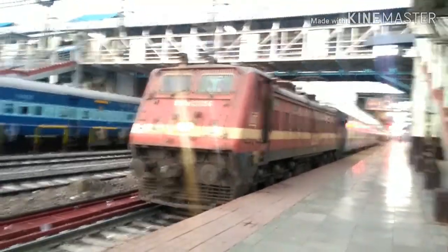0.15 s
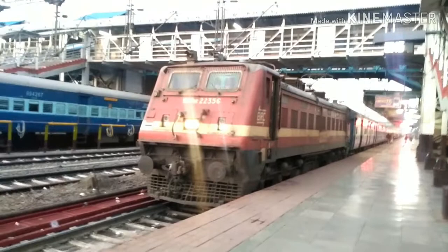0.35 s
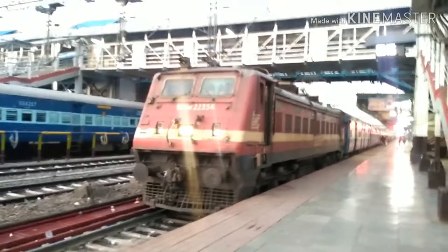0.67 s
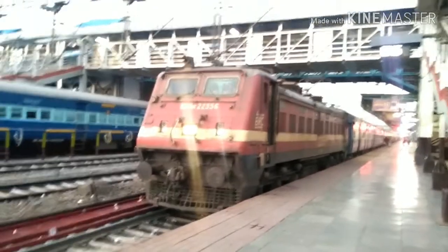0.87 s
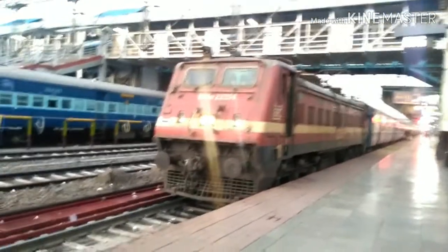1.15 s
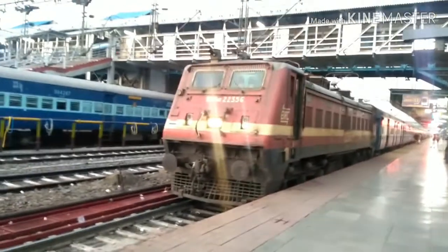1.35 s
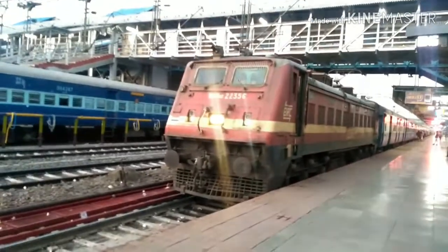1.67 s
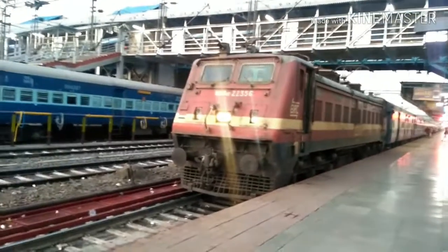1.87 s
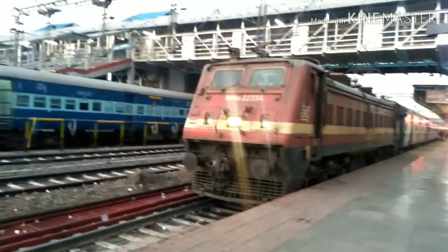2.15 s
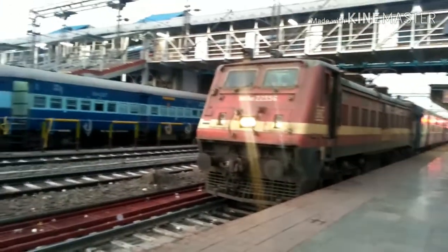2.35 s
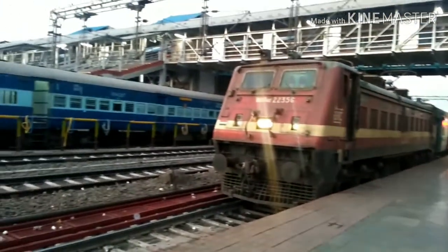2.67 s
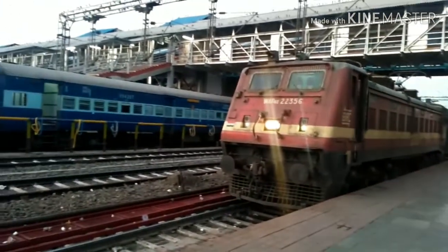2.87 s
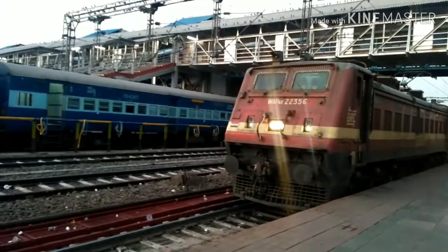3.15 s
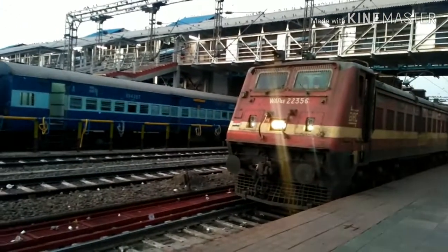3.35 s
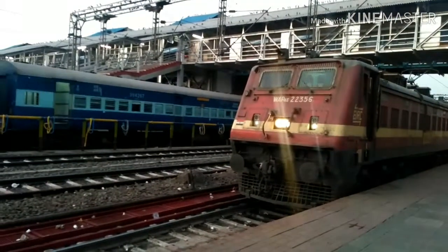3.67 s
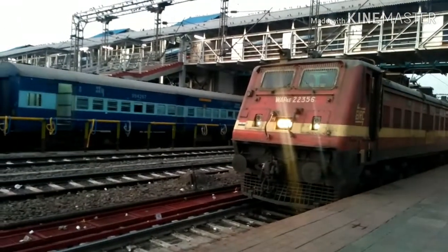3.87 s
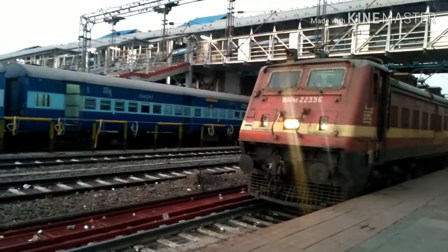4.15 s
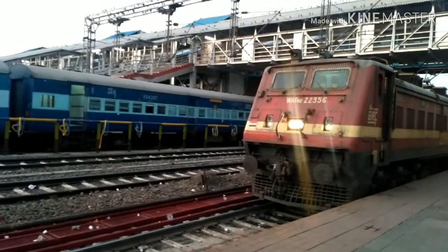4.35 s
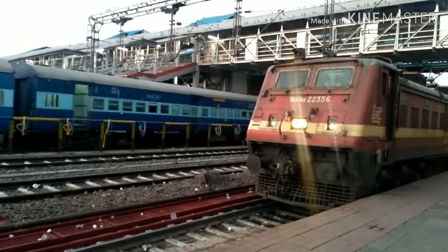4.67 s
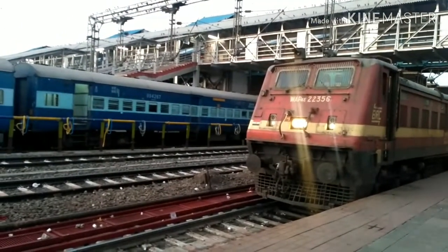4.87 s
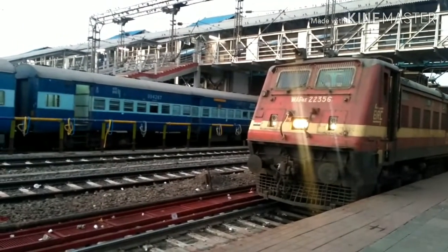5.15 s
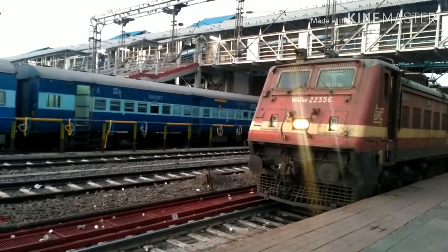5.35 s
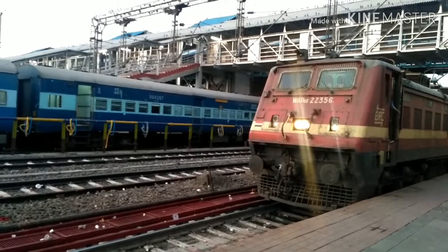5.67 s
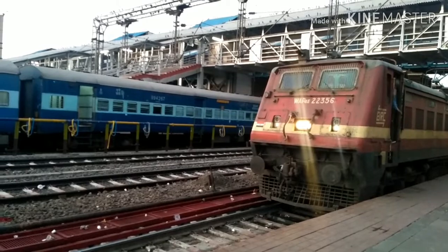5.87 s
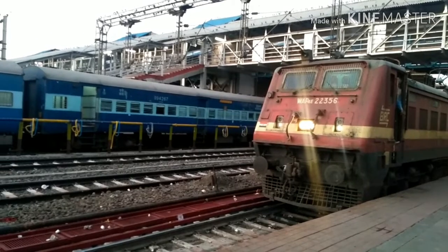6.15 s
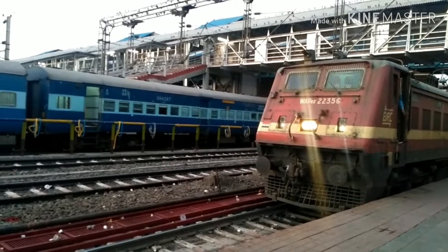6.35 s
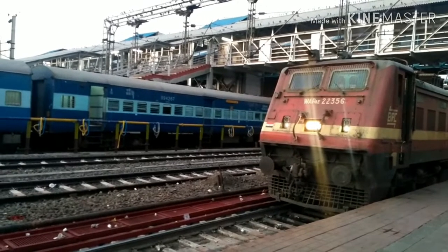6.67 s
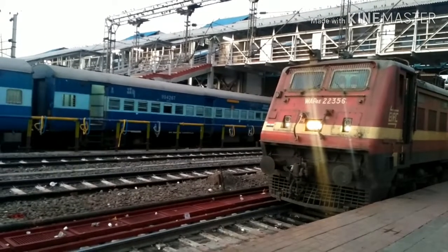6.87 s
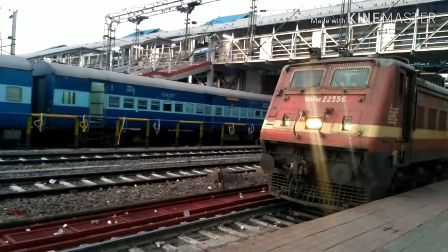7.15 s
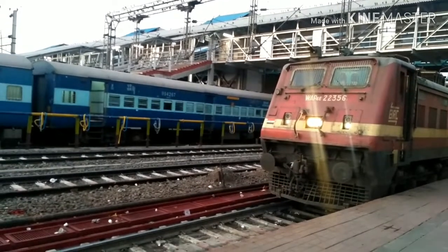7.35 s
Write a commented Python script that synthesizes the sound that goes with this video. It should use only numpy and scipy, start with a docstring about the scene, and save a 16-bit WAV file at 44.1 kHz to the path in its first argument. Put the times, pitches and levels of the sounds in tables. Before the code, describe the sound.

Steady low machine hum and blower roar, twittering birds under a roof, one short air hiss, later a much louder sharp blast of vented air.

```python
"""Locomotive venting brake air under a station roof

An electric locomotive stands at a roofed platform and twice vents brake air, the second time loud and close:
noise jets that reach lower as they blow harder. An idling engine and a compressor hum below as sines, blowers
roar and whine as filtered noise, and soft pitched blips ring in the rumble. Near birds chirp with clear
overtones and echo from the roof; a flock farther off blurs into a twitter of gliding noise bands."""
import sys
import numpy as np
from scipy import signal
from scipy.fft import rfft, irfft
from scipy.io import wavfile
from scipy.ndimage import uniform_filter1d

SR = 44100
rng = np.random.default_rng(int(sys.argv[2]) if len(sys.argv) > 2 else 0)


def unload_wav(signal):
    """Save mono or channel-first audio to the path in sys.argv[1] as 16-bit WAV at rate SR, clipped to [-1, 1]."""
    wavfile.write(
        sys.argv[1],
        SR,
        np.round(np.clip(np.atleast_2d(signal).T, -1, 1) * 32767).astype(np.int16),
    )


N = 331191
T = np.arange(N) / SR
HZ = np.maximum(np.fft.rfftfreq(N, 1 / SR), 1)

# Engine hum, steady tones: (multiple of the cycle rate, level [dB])
ENGINE_TONES = [(7, -66), (9, -60), (10, -66), (11, -62), (12, -60), (16, -57), (17, -63)]
# Strongest engine tones, which also waver by chance: (multiple of the cycle rate, mean level [dB])
WAVERING_ENGINE_TONES = [(13, -47.5), (15, -48)]
# Compressor hum, steady tones: (multiple of the cycle rate, level [dB])
COMPRESSOR_TONES = [(5, -78), (6, -65), (7, -69), (9, -72.5), (10, -91), (11, -61.5), (12, -61.5),
                    (13, -70), (17, -92)]
# Slow swells of two hum tones: (time [s], engine tone 8 mean level [dB], compressor tone 14 level [dB])
HUM_SWELLS = [(0.0, -58, -64), (0.12, -44.5, -49.5), (0.77, -45.5, -50), (0.9, -43.5, -66.5),
              (1.07, -49, -49.5), (2.53, -44, -65), (2.82, -54, -57.5), (2.97, -51.5, -80),
              (3.03, -48, -60.5), (3.72, -42, -65.5), (4.1, -51, -56.5), (5.21, -45.5, -48.5),
              (5.88, -50.5, -67), (6.78, -45, -72.5), (6.94, -46.5, -57.5), (7.51, -52, -66.5)]
# Blower whines: (pitch [Hz], width [Hz], level [dB])
BLOWER_WHINES = [(300, 3, -59), (866.7, 4, -63), (968.8, 1, -63), (1194, 3, -68), (5432, 30, -66)]
# Slow course of blowers and station: (time [s], level below 2 kHz [dB], treble re its usual level [dB])
ROAR_COURSE = [(0.0, -44.5, 0.5), (0.44, -44, 1), (1.57, -44, -1.5), (1.78, -44.5, -1), (3.91, -44.5, 1.5),
               (4.14, -44.5, 1), (6.07, -44, -0.5), (6.3, -44, -1), (7.51, -44.5, -3)]
# Colour of blowers and station: (frequency [Hz], relative density [dB per Hz])
ROAR_COLOUR = [(25, -26), (36, -29.5), (44, -20.5), (90, -14), (125, -8), (250, -7.5), (330, -13),
               (700, -11.5), (950, -16.5), (1400, -19.5), (3400, -23), (4700, -27), (6000, -30),
               (10000, -26), (15300, -46)]
# Far flock, lower voices, clearest calls: (time of peak [s], level [dB], pitch [Hz], held [s])
LOW_CALLS = [(.178, -43.5, 3140, 0.0188), (.225, -47.5, 3190, 0.0147), (.5, -48, 3100, 0.0556),
             (.75, -44, 3440, 0.016), (.9, -51, 3345, 0.0227), (1.45, -50, 3250, 0.018),
             (2.0, -47, 3240, 0.046), (2.1, -51, 3260, 0.105), (2.47, -48, 3270, 0.022),
             (2.655, -43.5, 3120, 0.04943), (2.75, -47, 3400, 0.034), (2.85, -49.5, 3350, 0.056),
             (2.92, -42, 3160, 0.0656), (3.011, -42.5, 3400, 0.03033), (3.09, -43, 3220, 0.0196),
             (3.435, -46, 3240, 0.0238), (3.54, -48, 3380, 0.0178), (3.6, -40, 3190, 0.037),
             (3.74, -46, 3200, 0.0274), (3.78, -38.5, 3260, 0.013), (3.85, -47, 3210, 0.036),
             (3.97, -48.5, 3116, 0.095), (4.1, -41.5, 3250, 0.0545), (4.17, -39, 3380, 0.0437),
             (4.32, -47.5, 3100, 0.085), (4.44, -46, 3401, 0.051), (4.5, -42.5, 3160, 0.03),
             (4.75, -51.5, 3290, 0.0179), (4.94, -51, 3190, 0.096), (5.05, -47.5, 3370, 0.056),
             (5.14, -46, 3000, 0.032), (5.21, -48, 3094, 0.098), (5.44, -50, 3240, .02),
             (5.62, -43, 3310, 0.034), (5.87, -48.5, 3260, 0.028), (6.99, -52.5, 3300, 0.0096),
             (7.17, -49.5, 3290, 0.028), (7.34, -52, 3250, 0.028)]
# Far flock, higher voices: (time of peak [s], level [dB])
HIGH_CALLS = [(1.49, -55.5), (1.72, -56.5), (2.23, -50.5), (2.3, -48), (2.36, -48.5), (2.475, -41.5),
              (2.52, -52.5), (2.78, -44.5), (2.93, -53.5), (3.03, -57.5), (3.24, -46.5), (3.34, -50.5),
              (3.52, -51), (3.62, -55), (3.76, -53), (4.17, -46.5), (4.25, -51.5), (4.51, -50),
              (4.58, -56.5), (4.68, -49.5), (4.74, -51), (4.78, -59), (4.996, -53), (5.05, -56.5),
              (5.13, -52), (5.47, -53.5)]
# Brake air, one list per venting: (time [s], jet core near 10 kHz [dB], shoulder near 6 kHz re core [dB])
VENTINGS = [
    [(0.158, -40, -12), (0.176, -32.5, -32), (0.23, -25, -9.5), (0.3, -23.5, -12.5), (0.342, -23.5, -14.5),
     (0.418, -21, -17.5), (0.466, -20.5, -10), (0.574, -23, -12.5), (0.698, -33, -18), (0.79, -55, -10)],
    [(5.51, -44.5, -17), (5.54, -21.5, -21), (5.55, -16, -11.5), (5.63, -15, -12), (5.72, -16, -13.5),
     (5.92, -14, -16), (6.05, -18, -16), (6.075, -15, -17), (6.13, -9.5, -11), (6.27, -8.5, -8.5),
     (6.32, -13, -7.5), (6.43, -22, -7.5), (6.56, -25.5, -20.5), (6.6, -35.5, -20.5), (6.64, -44.5, -10),
     (7.51, -48.5, -10.5)],
]
# Share of extra top in each venting: the first is farther off and duller: (share [gain])
VENTING_SHARPNESS = [-0.263, 0.044]
# Colour of the air jet: (frequency [Hz], relative density [dB per Hz])
JET_COLOUR = [(900, -46), (1500, -28.5), (2700, -18), (3900, -20), (4800, -17.5), (5100, -23.5),
              (6600, -17), (8600, 0), (10600, 1.5), (12200, -1), (15300, -15)]
# Near birds: (start [s], time to peak [s], length [s], first pitch [Hz], last pitch [Hz], peak level [dB],
# roughness at first [about 0-1], first throat centre [Hz], last throat centre [Hz], throat width [Hz])
NEAR_CHIRPS = [ (.172, 0.0182, 0.0344, 3270, 3200, -33.5, 0.2, 11000, 10600, 5000),
               (.205, 0.0328, 0.0406, 3290, 4410, -38.5, 0.68, 3400, 4500, 1400),
               (.222, .018, 0.0287, 3010, 2930, -28.5, 0.74, 8740, 8700, 1200),
               (.74, 0.024, .055, 2200, 2000, -49.5, 1.02, 4070, 3850, 1989),
               (.825, 0.016, 0.045, 2500, 2033, -48, .9, 8500, 10190, 4000),
               (1.485, 0.018, .045, 2620, 2212, -49, 0.7, 7440, 7900, 5000),
               (1.71, 0.012, 0.051, 2600, 2210, -51, .9, 6030, 6000, 4000),
               (2.05, .015, .06, 3560, 3070, -52, .2, 10700, 9120, 1980),
               (2.268, 0.0046, 0.0476, 3280, 3220, -54.5, 0.2, 11800, 11900, 4100),
               (2.32, 0.0242, 0.078, 2410, 2040, -44.5, 0.65, 7250, 6066, 2500),
               (2.41, 0.0232, 0.0313, 3040, 3150, -57, .1, 12000, 12000, 4000),
               (2.462, 0.0174, 0.077, 2180, 1400, -38.5, 0.45, 8850, 9490, 11990),
               (2.651, 0.00263, 0.0101, 3166, 2820, -41, 0, 9500, 8806, 2500),
               (2.657, .028, 0.037, 2850, 3010, -35, 0.04, 8800, 8900, 2500),
               (2.706, 0.0295, 0.165, 2138, 1467, -29, .1, 9100, 10760, 5540),
               (2.925, .005, .05, 2874, 2790, -45, 0.25, 8875, 8500, 5000),
               (2.978, 0.0215, 0.0293, 2030, 1722, -40, 0.3, 8100, 7100, 1998),
               (2.992, 0.0186, 0.0725, 1900, 1595, -30.5, 0.88, 11010, 10690, 2400),
               (3.0, 0.022, 0.044, 2300, 2140, -43.5, .85, 4410, 4270, 1800),
               (3.088, .018, .049, 3280, 3140, -47.5, 0.13, 3260, 3340, 1504),
               (3.34, 0.019, .045, 3050, 3000, -49, 0.68, 9200, 9150, 1500),
               (3.41, .005, 0.074, 3310, 3311, -48, .5, 6770, 6526, 2002),
               (3.534, 0.031, .116, 3475, 2850, -28.5, 0.25, 10180, 8920, 2630),
               (3.608, .003, 0.033, 3240, 3130, -56, 0.12, 9600, 9400, 1200),
               (3.598, 0.0173, 0.083, 3200, 3130, -43.5, 0.2, 3500, 3590, 1500),
               (3.76, 0.021, 0.092, 3220, 3270, -38, 0.94, 8624, 8900, 2490),
               (3.975, 0.025, 0.032, 3130, 3100, -52, 0.21, 3900, 3400, 4970),
               (4.055, .01, 0.035, 3250, 3100, -51.5, .1, 8000, 8530, 5014),
               (4.098, 0.0283, 0.035, 3323, 2900, -42, 0, 9500, 9100, 5010),
               (4.092, 0.02, 0.081, 2915, 1520, -38.5, 0.64, 8760, 7810, 3500),
               (4.171, .022, 0.0414, 3450, 3185, -43, 0.07, 7550, 7520, 4000),
               (4.645, 0.0329, .09, 2300, 1900, -46, 0.88, 6774, 6310, 2500), ]
# Soft pitched blips in the rumble, perhaps far knocks:
# (time [s], strength before the swell softens it [dB], pitch [Hz])
KNOCKS = [(.456, -30.5, 1107), (.515, -28, 281), (.623, -25, 793.7), (.70, -27, 236), (1.003, -26.5, 256.6),
          (1.279, -29.5, 774), (1.979, -28.5, 462), (2.30, -22.5, 200.4), (2.872, -25.5, 623),
          (2.872, -27.5, 385), (2.94, -30, 879), (3.022, -29.5, 290.4), (3.319, -28.5, 785.4),
          (4.179, -31.5, 466.5), (4.296, -29.5, 503.2), (4.80, -29, 415.7), (4.939, -29.5, 726),
          (5.103, -29.5, 500.6), (5.494, -30.5, 921), (5.60, -31.5, 510), (6.30, -27.5, 197),
          (6.68, -26, 189), (6.869, -30, 626), (7.0, -30, 418), (7.229, -32, 847.6)]

ENGINE_HZ, COMPRESSOR_HZ = 6.134, 16.52   # cycle rates
WAVER_DB, WAVER_HZ = 2, 5.6   # chance waver of the strongest engine tones

CALL_RISE_DB_S, LOW_FALL_DB_S = 497.5, 243   # far calls swell, lower ones die (dB per s)
HIGH_HELD_S, HIGH_FALL_DB_S = 0.011, 177   # higher calls are short and trail longer
LOW_BED_DB, HIGH_BED_DB = -56.5, -74   # murmur of the rest of the flock
CALL_SAG_HZ_S = 910.7   # far calls sag in pitch (Hz per s)

SHOULDER_HZ, CORE_HZ = 5000, 8800
# The jet's roar below the shoulder trails it and grows as a power of it
ROAR_DB, ROAR_GROWTH, ROAR_LAG_S = -9.5, 1.326, 0.014

CHIRP_RISE_DB_S, CHIRP_FALL_DB_S = 441, 250   # near chirps swell and die (dB per s)
GLIDE_END_S, HOLD_SHARE = 0.07, 0.55   # pitch holds for a share of the swell; latest end of its glide
HOARSE_PER_S = 3.9   # roughness gained per second after the peak
ROOF_T60_S, ROOF_DB = 0.18, -5.5
CUTOFF_HZ = 15380


def from_db(db):
    """Turn decibels into gain."""
    return 10 ** (np.asarray(db) / 20)


def rms_one(x):
    """Scale a sound to rms 1."""
    return x / np.sqrt(np.mean(x ** 2) + 1e-20)


def in_time(rows, t=T):
    """Read the columns of a table at times t, straight between its points."""
    s, *columns = np.transpose(rows)
    return [np.interp(t, s, column) for column in columns]


def drift(rate_hz):
    """Slow chance of spread 1: noise at every 20th sample through a double one-pole low-pass."""
    pole = np.exp(-40 * np.pi * rate_hz / SR)
    noise = rng.standard_normal(N // 20 + 4002)
    slow = signal.lfilter([1], [1, -2 * pole, pole * pole], noise)[4000:]   # drop the filter's start
    return np.interp(np.arange(N) / 20, np.arange(len(slow)), rms_one(slow))


def coloured(colour):
    """Spectrum of white noise weighted by a colour table, straight on a log frequency axis."""
    hz, db = np.transpose(colour)
    return rfft(rng.standard_normal(N)) * from_db(np.interp(np.log(HZ), np.log(hz), db))


def band(spectrum, low, high):
    """Turn one slice of a spectrum into sound."""
    return irfft(spectrum * (HZ >= low) * (HZ < high), N)


def narrow(hz, width_hz):
    """Noise twice through one resonance: a wavering tone of rms 1."""
    resonance = 1 / (1 + (2 * (HZ - hz) / width_hz) ** 2)
    return rms_one(irfft(rfft(rng.standard_normal(N)) * resonance, N))


def gliding_noise(hz, width_hz):
    """Noise of a given width carried along a moving centre; rms 1."""
    low_pass = signal.butter(4, width_hz / 2, fs=SR, output="sos")
    grain = signal.sosfilt(low_pass, rng.standard_normal((2, len(hz))))
    phase = 2 * np.pi * np.cumsum(hz) / SR
    return rms_one(grain[0] * np.cos(phase) + grain[1] * np.sin(phase))


def peaked(t, db, rise_db_s, fall_db_s, held_s=0):
    """Level in dB that climbs straight to db at t = 0, holds, and sinks straight after."""
    return db + np.minimum(np.minimum(rise_db_s * t, 0), fall_db_s * (held_s - t))


def machines():
    """Engine and compressor sound as sines on multiples of their cycle rate; blowers whine as narrow noise."""
    engine_db, compressor_db = in_time(HUM_SWELLS)
    tones = [(k * ENGINE_HZ, db) for k, db in ENGINE_TONES]
    tones += [(k * COMPRESSOR_HZ, db) for k, db in COMPRESSOR_TONES]
    tones += [(k * ENGINE_HZ, db + WAVER_DB * drift(WAVER_HZ)) for k, db in WAVERING_ENGINE_TONES]
    tones.append((8 * ENGINE_HZ, engine_db + 1.5 * drift(8.0)))
    tones.append((14 * COMPRESSOR_HZ, compressor_db))
    hum = np.zeros(N)
    for hz, db in tones:
        hum += np.sqrt(2) * from_db(db) * np.sin(2 * np.pi * (hz * T + rng.random()))
    return hum + sum(from_db(db) * narrow(hz, width) for hz, width, db in BLOWER_WHINES)


def station(patchy_db=1.5, swell_db=1.1, treble_hz=2000):
    """Broad roar of blowers and station in half-octave noise bands, each swelling on its own."""
    low_db, treble_db = in_time(ROAR_COURSE)
    noise = coloured(ROAR_COLOUR)
    scale = 1 / np.std(band(noise, 110, 2000))
    edges = 20 * 2 ** (np.arange(21) / 2)
    roar = np.zeros(N)
    for low, high in zip(edges, edges[1:]):
        swell = patchy_db * drift(9.87) + swell_db * drift(1.43)
        roar += band(noise, low, high) * from_db(swell + treble_db * (low > treble_hz))
    return scale * from_db(low_db) * roar


def calls(rows, bed_db, fall_db_s):
    """Gain of a flock from (s, dB, held s): the loudest call of the moment, or the murmur below."""
    level_db = np.full(N, float(bed_db))
    for s, db, held_s in rows:
        level_db = np.maximum(level_db, peaked(T - s, db, CALL_RISE_DB_S, fall_db_s, held_s))
    return from_db(level_db)


def call_pitch():
    """Pitch of the latest lower call, taken up just before its peak, sagging through its own pitch mid-hold."""
    s, _, hz, held_s = np.transpose(LOW_CALLS)
    latest = np.clip(np.searchsorted(s - 0.012, T) - 1, 0, None)
    since_middle = np.clip(T - s[latest] - held_s[latest] / 2, -0.05, 0.1)
    return uniform_filter1d(hz[latest] - CALL_SAG_HZ_S * since_middle, size=200)


def flock(wander=0.018, burst_db=1.84):
    """Far chirps: a wandering squeal with faint overtones, blurred by echoes and by other birds."""
    pitch = call_pitch() * (1 + wander * drift(12))
    squeal = gliding_noise(pitch, 155.7)
    squeal += from_db(-9.5) * gliding_noise(2 * pitch, 300)
    squeal += from_db(-21) * gliding_noise(3 * pitch, 500)
    blur = from_db(-0.08) * gliding_noise(pitch, 827)
    blur += from_db(-2) * gliding_noise(3950 * (1 + wander * drift(8)), 694)
    high = gliding_noise(5500 * (1 + wander * drift(8)), 1264)
    high += from_db(-1.5) * gliding_noise(np.full(N, 5430.), 200)

    low_rows = [(s, db, held_s) for s, db, _, held_s in LOW_CALLS]
    high_rows = [(s, db, HIGH_HELD_S) for s, db in HIGH_CALLS]
    low_voices = calls(low_rows, LOW_BED_DB, LOW_FALL_DB_S) * rms_one(squeal + blur)
    high_voices = calls(high_rows, HIGH_BED_DB, HIGH_FALL_DB_S) * rms_one(high)
    return from_db(burst_db * drift(23.9)) * (low_voices + high_voices)


def brake_air(flutter_db=0.5, own_db=2.0):
    """Turbulent jet: the harder it blows, the lower its noise reaches; eddies make it flutter."""
    jet, out = coloured(JET_COLOUR), np.zeros(N)
    rise = np.clip((HZ - SHOULDER_HZ) / (CORE_HZ - SHOULDER_HZ), 0, 1)
    upper = np.sin(np.pi / 2 * rise) ** 2   # shoulder fades into core
    core = rms_one(irfft(jet * upper, N))
    shoulder = rms_one(band(jet * (1 - upper), SHOULDER_HZ, SR))
    roar = rms_one(band(jet, 0, SHOULDER_HZ)) * from_db(own_db * drift(16.7))
    edge = rms_one(irfft(jet * upper * (HZ / CORE_HZ) ** 2, N))   # the sharpest part of the jet
    lag = np.exp(-1 / (ROAR_LAG_S * SR))
    for vent, sharp in zip(VENTINGS, VENTING_SHARPNESS):
        core_db, shoulder_db = in_time(vent)
        opening = np.clip((T - vent[0][0]) / 0.0084, 0, 1) * (T <= vent[-1][0])
        flow = opening * from_db(core_db)
        lower = flow * from_db(shoulder_db)
        trailing = signal.lfilter([1 - lag], [1, -lag], lower)
        out += flow * (core + sharp * edge) + lower * shoulder
        out += from_db(ROAR_DB) * trailing ** ROAR_GROWTH * roar
    return out * from_db(flutter_db * drift(61))


def birds(leak_db=-17, leak_hz=7000, leak_width_hz=13000, edge_s=0.00089, jitter=0.02496, flutter_db=3.0):
    """Overtones of a gliding, trembling pitch weighted by the throat; rough parts turn into throat-band noise."""
    out, tremble, flutter = np.zeros(N), drift(147.7), drift(94)
    order = np.arange(1, 12)[:, None]
    for s, peak_s, length, first, last, db, rough, throat_first, throat_last, width in NEAR_CHIRPS:
        i, j = round(s * SR), round((s + length) * SR)
        t = T[i:j] - s
        hold_s = HOLD_SHARE * peak_s
        glide = np.clip((t - hold_s) / (min(length, GLIDE_END_S) - hold_s), 0, 1)
        pitch = first + (last - first) * glide
        throat = throat_first + (throat_last - throat_first) * glide
        rough = np.clip(rough + HOARSE_PER_S * np.maximum(t - peak_s, 0), 0, 1)

        hz = order * pitch
        weight = np.exp(-(2 * (hz - throat) / width) ** 2)
        leak = from_db(leak_db) * np.exp(-(2 * (hz - leak_hz) / leak_width_hz) ** 2)
        weight += leak * (hz > 2500)   # a small body radiates no lows
        shaky = pitch * (1 + jitter * np.sqrt(rough) * tremble[i:j])
        phase = 2 * np.pi * np.cumsum(shaky) / SR
        voice = np.sqrt(2) * np.sum(weight * np.sin(order * phase), axis=0)
        voice *= from_db(flutter_db * flutter[i:j]) / np.sqrt(np.sum(weight ** 2, axis=0))

        fade = np.clip(np.minimum(t, length - t) / edge_s, 0, 1)
        fade *= from_db(peaked(t - peak_s, db, CHIRP_RISE_DB_S, CHIRP_FALL_DB_S))
        breath = gliding_noise(throat, width)
        out[i:j] += fade * (np.sqrt(1 - rough) * voice + np.sqrt(rough) * breath)
    return out


def roof(x):
    """Dense echoes from roof and carriage sides: decaying noise of unit energy."""
    t = np.arange(SR // 2) / SR
    tail = rng.standard_normal(len(t)) * from_db(-60 * t / ROOF_T60_S) * (t > 0.012)
    return signal.fftconvolve(x, tail / np.sqrt(np.sum(tail ** 2)))[:N]


def knocks(t60=0.0693):
    """Each blip swells briefly and rings out on one pitch."""
    out, t = np.zeros(N), np.arange(SR // 5) / SR
    for s, db, hz in KNOCKS:
        i = round(s * SR)
        shape = (1 - np.exp(-t / 0.00356)) * from_db(db - 2 - 60 * t / t60)
        out[i:i + len(t)] += (shape * np.sin(2 * np.pi * hz * t))[:N - i]
    return out


def scene():
    """One microphone, heard alike in both channels."""
    near = birds()
    mono = machines() + station() + flock() + brake_air()
    mono += near + from_db(ROOF_DB) * roof(near) + knocks()
    return np.array([mono, mono])


def record(dry, top=0.98):
    """The input stage flattens the loudest peaks, the top is cut, and what overshoots full scale clips."""
    cut = signal.ellip(12, 0.3, 70, CUTOFF_HZ, fs=SR, output="sos")
    return np.clip(signal.sosfilt(cut, np.clip(dry, -top, top)), -1, 1)


dry = scene()
out = record(dry)
unload_wav(out)
```